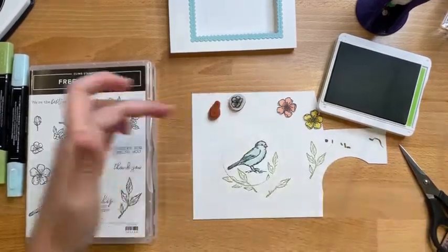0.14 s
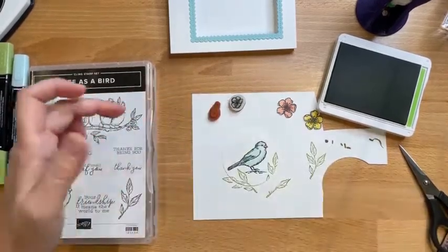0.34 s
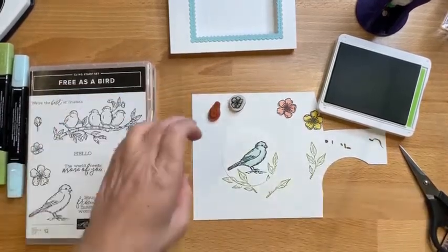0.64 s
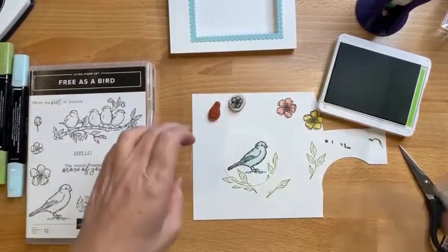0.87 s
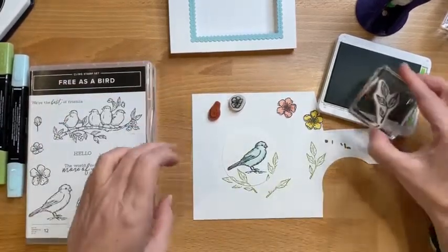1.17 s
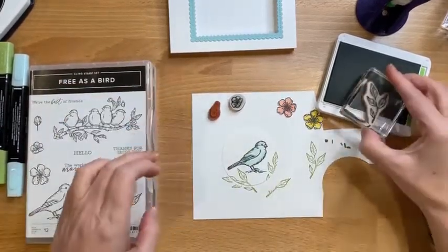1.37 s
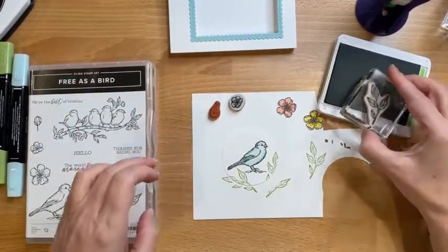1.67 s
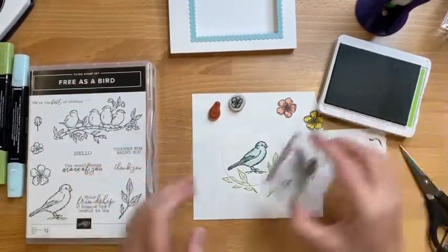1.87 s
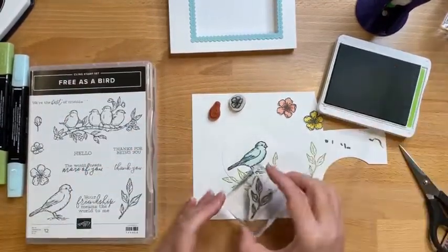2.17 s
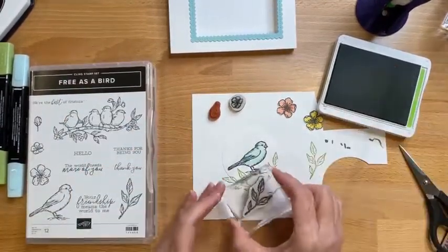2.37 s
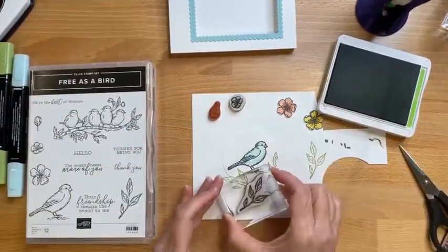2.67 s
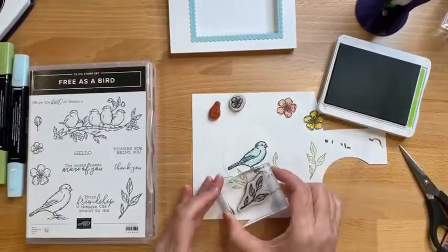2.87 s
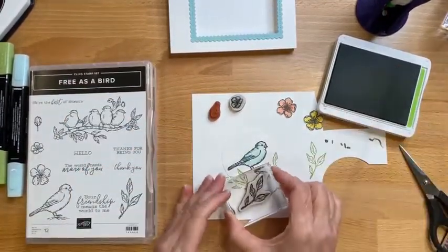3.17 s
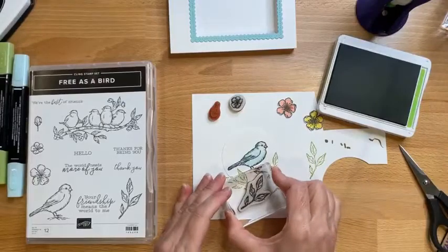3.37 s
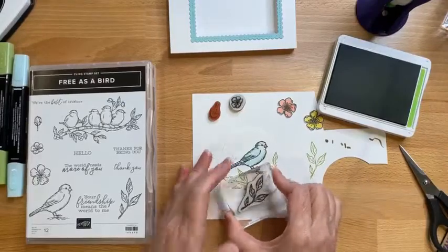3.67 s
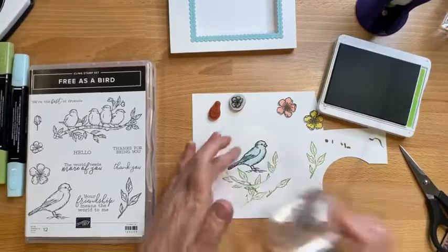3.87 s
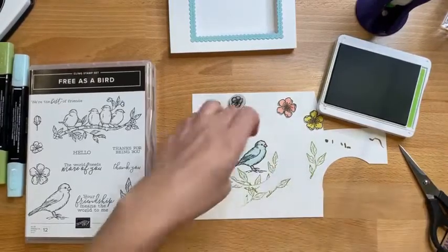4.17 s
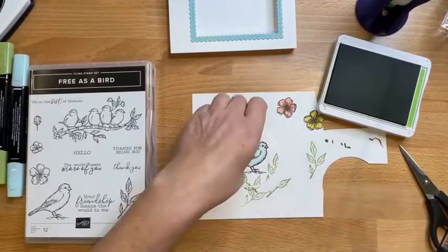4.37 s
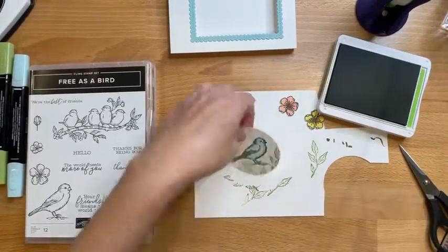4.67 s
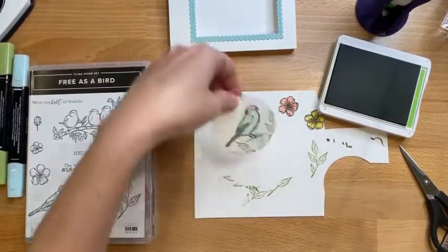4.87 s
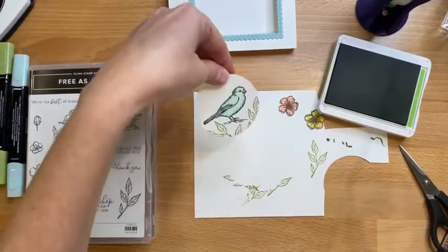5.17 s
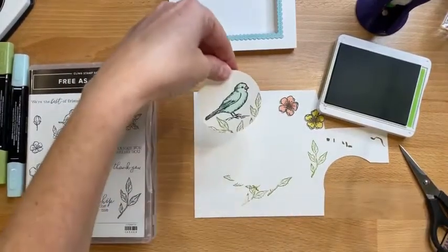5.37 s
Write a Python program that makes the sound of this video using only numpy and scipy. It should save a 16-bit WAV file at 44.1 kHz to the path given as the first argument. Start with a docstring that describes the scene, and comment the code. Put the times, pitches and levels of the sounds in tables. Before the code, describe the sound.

Close view of craft stamping on a wooden desk in a small quiet room with faint low hum. A tiny paper brush, then soft quick dabs on an ink pad and a sharp clack as the plastic block lands on card. Near-silence while it is pressed, then a tacky peel snap, finger brushes, and a round card dragged and flicked up with a hollow tap.

```python
"""Rubber stamping at a wooden desk in a small room: low mains hum (sines) and still air (noise) throughout.
Stamp and fingertips first brush the paper (grains of fibre noise) and a tacky snap follows (a noise burst).
An acrylic block is dabbed on an ink pad, then clacks onto card stock edge first and is pressed still (modes).
The stamp peels off with snaps, fingers brush, and the hand comes down on the sheet (dull rumble). Then a round
card is dragged off (friction ringing its edge), flicking up early on (modes); a last snap and brush follow."""
import sys
import numpy as np
from scipy import signal
from scipy.fft import rfft, irfft, next_fast_len
from scipy.io import wavfile

SR = 44100
rng = np.random.default_rng(int(sys.argv[2]) if len(sys.argv) > 2 else 0)


def digitize_waveform(pressure):
    """Quantize a signal to 16-bit integers and store it at the path in sys.argv[1].

    Rows of a 2-D input are taken as channels; values are limited to [-1, 1].
    """
    field = np.atleast_2d(pressure).T
    bounded = np.clip(field, -1, 1)
    quanta = np.round(bounded * 32767).astype(np.int16)
    wavfile.write(sys.argv[1], SR, quanta)


N = 243431
TIME = np.arange(N) / SR

# mains hum, before its overall gain: [f/Hz, rms level/dB]
HUM_LINES = [(59.3, -74), (119.9, -56), (177.8, -83)]
# still air of the room: [f/Hz, level/dB per Hz]
AIR_SPECTRUM = [(25, -119), (50, -103), (75, -89), (105, -89), (135, -82), (175, -95.5), (260, -104),
                (450, -109.5), (1000, -115.5), (1550, -114), (2200, -121), (5000, -124), (9000, -127),
                (12000, -133), (16000, -135)]

# colour of paper friction, relative: [f/Hz, level/dB per Hz]
PAPER_COLOUR = [(400, -16.5), (750, -7), (1100, -5), (1500, 0), (2400, -0.5), (3500, 0), (5500, -2),
                (8000, -4.5), (11000, -11), (13000, -18), (15500, -15)]
# stamp and fingertips brush the paper: [peak t/s, level/dB, rise/s, fall/s, tilt/dB per octave]
PAPER_BRUSHES = [(0.113, -61.5, 0.01, 0.0093, 11.5), (2.585, -84, .17, 0.11, 5.5),
                 (3.885, -66.5, 0.068, 0.041, 1), (4.010, -72.5, 0.021, 0.025, 8),
                 (4.168, -65.5, 0.024, 0.009, 19.5), (4.165, -80.5, 0.14, 0.18, 3.5),
                 (4.485, -80, .06, 0.065, 13), (4.549, -67, 0.014, 0.024, 9.5),
                 (4.689, -74, 0.011, 0.016, 0.5), (5.100, -85.5, 0.12, 0.13, 8.5)]
# a stroke lies this far under its peak one rise earlier and one fall later; roundness 1 is pointed, 2 a bell
STROKE_FADE_DB, STROKE_ROUNDNESS = 13.5, 1.58
SILENT_DB = -140
# small snaps of tacky rubber and paper: [t/s, level/dB, tilt/dB per octave]
TACKY_SNAPS = [(0.781, -72, 7), (3.838, -55, 0.5), (4.46, -70.5, 11), (4.505, -69, 7), (4.518, -66, 3),
               (4.835, -57, -3), (5.041, -62.5, -6)]

# centres of the thump, knock and clack registers: [f/Hz]
REGISTER_CENTRES = [230, 750, 2300]
# block dabbed on the ink pad: [t/s, level/dB, extra thump level/dB, extra clack level/dB, contact bandwidth f/Hz]
PAD_DABS = [(1.5550, -1.5, -7, -3.5, 2264), (1.5578, -11.5, -7, 11, 8920), (1.6252, -10, 6, 14, 1800),
            (1.6590, -5, 4, 6, 1900), (1.6960, 0, -14, 0, 1407)]
# resonances of block and ink pad: [f/Hz, width f/Hz, level/dB]
PAD_MODES = [(214, 51, 2.5), (503, 63, -1.5), (765, 89, -2.5), (1004, 120, -7.5), (1356, 240, -20.5),
             (1735, 120, -24.5), (1868, 100, -26.5), (2360, 180, -20), (3220, 280, -29), (3900, 520, -28.5),
             (5840, 830, -39), (9000, 1200, -41.5)]
# block lands on one edge, falls flat and rocks to rest:
# [t/s, level/dB, extra thump level/dB, extra clack level/dB, contact bandwidth f/Hz]
BLOCK_BLOWS = [(1.7651, -2, 7, 6.5, 4240), (1.8048, 17.5, -2, -2, 10500), (1.8105, 2.5, 4, -4.5, 1600),
               (1.8705, -12, 18.5, 8, 3430), (1.8945, -1, -2, -4, 1410)]
# resonances of the block on the desk: [f/Hz, width f/Hz, level/dB]
BLOCK_MODES = [(152.5, 10, 0.5), (230.6, 18, 3), (333.2, 88, -3.5), (460, 120.6, -3.5), (592, 67, -0.5),
               (767, 50, 3.5), (968, 59, 1.5), (1380, 80, -4), (1910, 200, -6.5), (2361, 110, -9),
               (2532, 130, -5.5), (3320, 670, -16.5), (3840, 280, -20.5), (4098, 93, -18.5),
               (4520, 210, -19.5), (5180, 230, -24.5), (6180, 710, -24.5), (8450, 970, -33),
               (9600, 700, -36.5), (12000, 2200, -41)]

# hand slides onto the sheet and comes down: [peak t/s, level/dB, rise/s, fall/s]
HAND_STROKES = [(4.500, -72, 0.3, 0.16), (4.524, -71.5, 0.015, 0.063)]
# colour of the hand's rumble, relative: [f/Hz, level/dB per Hz]
HAND_SPECTRUM = [(80, -39), (200, 1), (350, -6), (600, -7), (900, -19.5), (1400, -10), (2200, -28),
                 (15000, -88)]

# friction of the round card as it is dragged off the sheet: [t/s, level/dB]
SLIDE_LEVEL = [(4.665, -97), (4.685, -72), (4.741, -55.5), (4.821, -62.5), (4.853, -62), (4.869, -51.5),
               (4.881, -68.5), (4.95, -98)]
# its stiff edge sings as it drags: [f/Hz, width f/Hz, level/dB over the friction]
CARD_EDGE_MODES = [(580, 93, 24), (715, 34, 11), (3500, 3600, -5), (5652, 180, 3.5)]
# the lighter the drag, the thinner its sound:
# tilt at the loudest (dB per octave), and what each dB less adds to it
SLIDE_TILT_DB, SLIDE_THINNING = 2, 0.124
# round card flicked up: [t/s, level/dB, extra thump level/dB, extra clack level/dB, contact bandwidth f/Hz]
FLICK_BLOWS = [(4.7203, 3.8, 1.5, -2, 910), (4.7268, 9.9, 0, 8.5, 3380), (4.7295, 2.3, 13.5, -27, 2000)]
# resonances of the round card: [f/Hz, width f/Hz, level/dB]
CARD_MODES = [(250, 24.7, 1), (362, 42, -12), (542, 40, -6), (737, 24.5, 0), (875, 136, -11.5),
              (1256, 110, -21), (1497, 33, -18), (1720, 88, -21.5), (2290, 85, -20), (2506, 71, -18),
              (3460, 260, -23), (4900, 400, -43)]

# a few quick, dull early echoes that colour the knocks: [delay t/s, gain]
EARLY_ECHOES = [(.0021, 0.14), (.0042, .28), (.0094, .12)]
# time for the room tail to fall 60 dB: [f/Hz, t60/s]
ROOM_DECAY = [(150, 0.3), (400, 0.48), (900, 0.38), (1450, 0.49), (1950, 0.32), (2700, 0.46), (6000, 0.32),
              (12000, 0.1)]
# strength of the room tail: [f/Hz, level/dB]
ROOM_STRENGTH = [(120, 3), (300, -9.5), (600, -8.5), (1000, -11), (1400, -0.5), (2000, -13), (2600, -14),
                 (5500, -10.5), (12000, -9)]
CUTOFF_HZ = 15800


def from_db(db):
    """Decibels to gain."""
    return 10 ** (np.asarray(db) / 20)


def rms_one(x):
    """Scale to unit rms."""
    return x / np.sqrt(np.mean(x ** 2) + 1e-20)


def at_hz(points, hz):
    """Read a table on a log-frequency axis."""
    f, value = np.transpose(points)
    return np.interp(np.log(np.maximum(hz, 1)), np.log(f), value)


def band(x, low, high):
    """Causal band-pass."""
    return signal.sosfilt(signal.butter(2, [low, high], "band", fs=SR, output="sos"), x)


def add(track, s, sound):
    """Mix a sound into a track at time s."""
    start = int(round(s * SR))
    track[start:start + len(sound)] += sound[:N - start]


def hum(level_db):
    """Steady low lines of a mains motor, each a sine of random phase."""
    total = np.zeros(N)
    for hz, db in HUM_LINES:
        phase = rng.random()
        total += np.sqrt(2) * from_db(db) * np.sin(2 * np.pi * (hz * TIME + phase))
    return from_db(level_db) * total


def coloured_noise(spectrum):
    """Steady noise with the given power per Hz, such as still air."""
    size = next_fast_len(N)
    gain = from_db(at_hz(spectrum, np.fft.rfftfreq(size, 1 / SR))) * np.sqrt(SR / 2)
    return irfft(rfft(rng.standard_normal(size)) * gain, size)[:N]


def swell(s, peak_db, rise, fall):
    """Gain of one stroke: it grows to its peak and dies away."""
    away = np.maximum((s - TIME) / rise, (TIME - s) / fall)
    level = peak_db - STROKE_FADE_DB * np.abs(away) ** STROKE_ROUNDNESS
    return from_db(np.maximum(level, SILENT_DB))


def flicker(per_s):
    """A random wander joining points of unit spread, drawn so many times a second."""
    steps = rng.standard_normal(4000)
    return np.interp(TIME * per_s, np.arange(len(steps)), steps)


def paper(drive, tilt_db, patchy_db):
    """Fibre noise through the colour of paper; each band flutters, and a positive tilt favours the treble."""
    edges = np.geomspace(400, 17000, 19)
    out, power = 0, 0
    for k, (low, high) in enumerate(zip(edges, edges[1:])):
        hz = np.sqrt(low * high)
        gain = from_db(at_hz(PAPER_COLOUR, hz) + tilt_db * np.log2(hz / edges[-1]))
        flutter = from_db(patchy_db * flicker(per_s=38))
        # neighbouring bands take separate noises
        out = out + gain * flutter * band(drive[k % 2] + 1e-18, low, high)
        power = power + gain ** 2 * (high - low) / (SR / 2)
    return out / np.sqrt(power)   # the tilt leaves the level alone


def rubbing(gain, tilt_db, catches_per_s, spread_db, hiss_db):
    """Fibres catch and let go in dense uneven grains over a smooth hiss."""
    caught = rng.random(N) < catches_per_s / SR
    grains = caught * from_db(spread_db * np.minimum(rng.exponential(1, N), 3))
    grip = rms_one(np.hypot(rms_one(grains), from_db(hiss_db)))
    return paper(gain * grip * rng.standard_normal((2, N)), tilt_db, patchy_db=4.0)


def fingers():
    """Stamp and fingertips catch on the paper in crackly grains; the loudest stroke sets the colour."""
    strokes = [swell(s, db, rise, fall) for s, db, rise, fall, _ in PAPER_BRUSHES]
    power = np.array(strokes) ** 2
    total = power.sum(axis=0)
    tilt = np.array(PAPER_BRUSHES)[:, -1] @ power / total
    return rubbing(np.sqrt(total), tilt, catches_per_s=700, spread_db=1.5, hiss_db=2.0)


def snaps(t60):
    """Each snap is a burst of fibres letting go, falling 60 dB in t60 seconds."""
    force = np.zeros(N)
    fade = from_db(-60 * TIME[:SR // 10] / t60)
    for s, db, _ in TACKY_SNAPS:
        add(force, s, from_db(db) * fade)
    times, _, tilts = np.transpose(TACKY_SNAPS)
    tilt = np.interp(TIME, times, tilts)
    return paper(force * rng.standard_normal((2, N)), tilt, patchy_db=0.0)


def resonate(x, hz, width):
    """A decaying sine with gain 1 at its resonance."""
    r, w = np.exp(-np.pi * width / SR), 2 * np.pi * hz / SR
    return signal.lfilter([0, 2 * (1 - r) * np.sin(w)], [1, -2 * r * np.cos(w), r * r], x)


def strike(blows, modes, scatter_db):
    """Each blow rings every mode; a softer contact is duller, and the blow sets the share of each register."""
    out = np.zeros(N)
    chance = rng.standard_normal((len(blows), len(modes)))
    for (s, level, thump, clack, contact_hz), luck in zip(blows, chance):
        contact = signal.butter(3, min(contact_hz, SR / 2 - 1), fs=SR, output="sos")
        force = signal.sosfilt(contact, signal.unit_impulse(SR // 4) + 1e-18)
        shares = list(zip(REGISTER_CENTRES, [thump, 0, clack]))
        for k, (hz, width, db) in enumerate(modes):
            gain = from_db(level + db + at_hz(shares, hz) + scatter_db * luck[k])
            sense = (-1) ** k   # neighbouring modes move in opposite senses
            add(out, s, sense * gain * resonate(force, hz, width))
    return out


def radiate(x, lowest_hz):
    """Small objects push little air in the bass."""
    return signal.sosfilt(signal.butter(3, lowest_hz, "high", fs=SR, output="sos"), x)


def ink_dabs():
    """Block and ink pad ring under each dab."""
    return radiate(strike(PAD_DABS, PAD_MODES, scatter_db=5.66), lowest_hz=116)


def block_landing():
    """The block's blows ring it together with the desk."""
    return radiate(strike(BLOCK_BLOWS, BLOCK_MODES, scatter_db=-0.58), lowest_hz=114)


def hand():
    """Dull rumble of the hand coming to rest on the sheet."""
    return sum(swell(*touch) for touch in HAND_STROKES) * rms_one(coloured_noise(HAND_SPECTRUM))


def sliding_card():
    """Friction under the moving card sets its own resonances going."""
    s, db = np.transpose(SLIDE_LEVEL)
    level = np.interp(TIME, s, db, left=SILENT_DB, right=SILENT_DB)
    tilt = SLIDE_TILT_DB + SLIDE_THINNING * (db.max() - level)
    friction = rubbing(from_db(level), tilt, catches_per_s=840, spread_db=1.5, hiss_db=1.0)
    edge = sum(from_db(db) * resonate(friction, hz, width) for hz, width, db in CARD_EDGE_MODES)
    return friction + edge


def card_flicks():
    """The round card rings in its own modes as it is flicked up."""
    return radiate(strike(FLICK_BLOWS, CARD_MODES, scatter_db=1.0), lowest_hz=122)


def early_echoes(x, dull_hz):
    """Quick, duller copies follow each sound and colour it."""
    out = np.zeros(N)
    dull = signal.sosfilt(signal.butter(1, dull_hz, fs=SR, output="sos"), x)
    for delay, gain in EARLY_ECHOES:
        add(out, delay, gain * dull)
    return out


def room(x, gap_s, build_s):
    """A diffuse tail that builds up after a short gap and dies soonest in the treble."""
    t, edges = TIME[:SR], np.geomspace(90, 17000, 16)
    onset, response = np.clip((t - gap_s) / build_s, 0, 1), 0
    for low, high in zip(edges, edges[1:]):
        hz = np.sqrt(low * high)
        decay = from_db(-60 * t / at_hz(ROOM_DECAY, hz))
        tail = band(rng.standard_normal(len(t)), low, high) * onset * decay
        even = np.sqrt((high - low) / (SR / 2) / np.sum(tail ** 2))   # energy in step with bandwidth
        response = response + tail * from_db(at_hz(ROOM_STRENGTH, hz)) * even
    return signal.fftconvolve(x, response)[:N]


def scene():
    """All the desk sounds in the room, over hum and still air."""
    background = hum(level_db=0.5) + coloured_noise(AIR_SPECTRUM)
    handling = fingers() + snaps(t60=0.045) + hand() + sliding_card()
    dabs, block, card = ink_dabs(), block_landing(), card_flicks()
    knocks = dabs + block + card
    # each source excites the room to its own degree
    sent = block + from_db(1.5) * dabs + from_db(-3.0) * card + from_db(-3.5) * handling
    wet = room(sent, gap_s=.007, build_s=.008)
    return (knocks + early_echoes(knocks, dull_hz=3508) + handling + wet + background)[None]


def record(dry):
    """The microphone loses the deepest bass; the top is cut."""
    dry = signal.sosfilt(signal.butter(2, 35, "high", fs=SR, output="sos"), dry)
    return signal.sosfilt(signal.ellip(10, .1, 70, CUTOFF_HZ, fs=SR, output="sos"), dry)


dry = scene()
out = record(dry)
digitize_waveform(out)
```